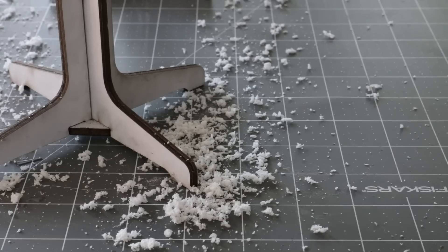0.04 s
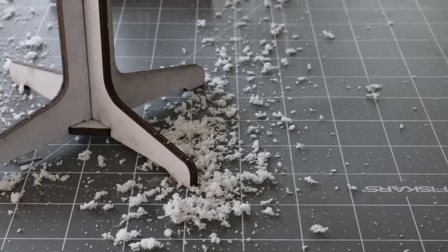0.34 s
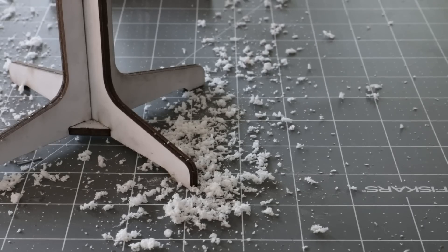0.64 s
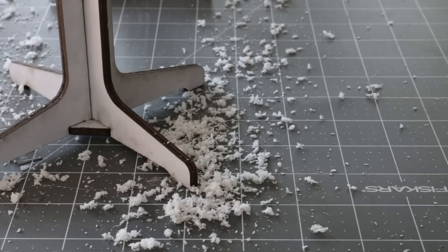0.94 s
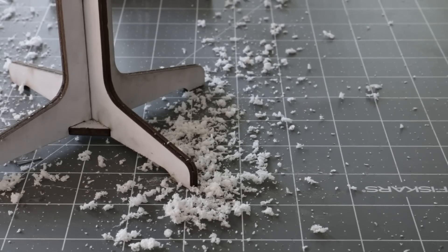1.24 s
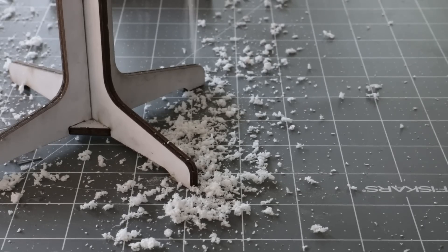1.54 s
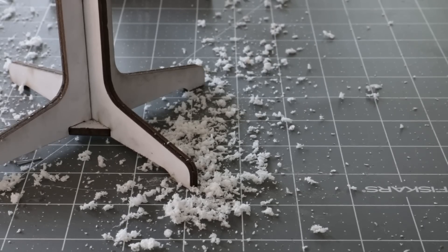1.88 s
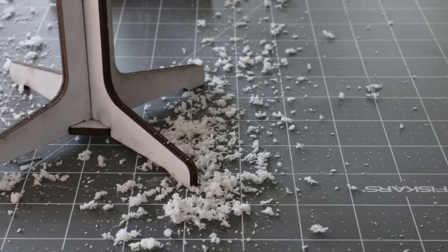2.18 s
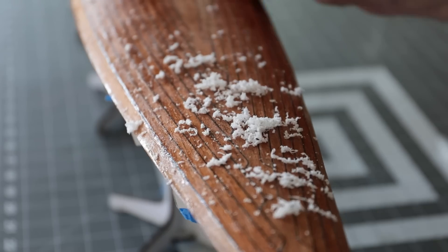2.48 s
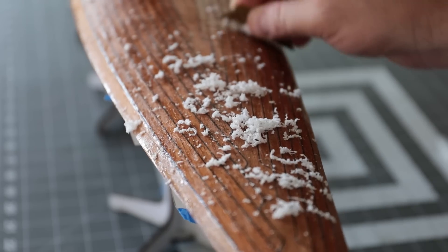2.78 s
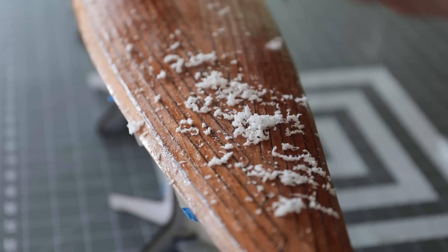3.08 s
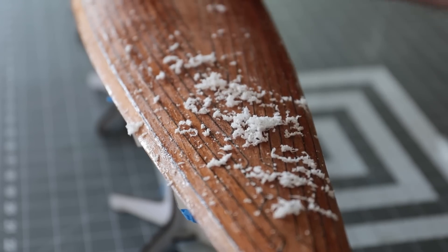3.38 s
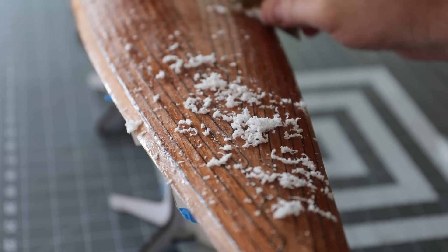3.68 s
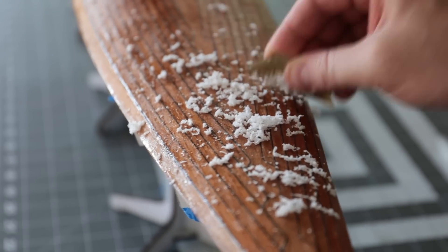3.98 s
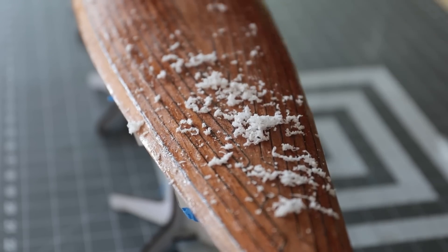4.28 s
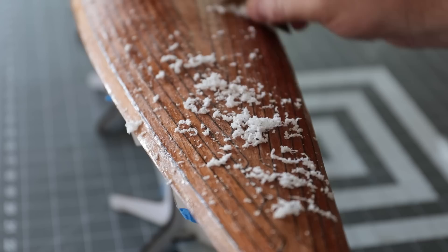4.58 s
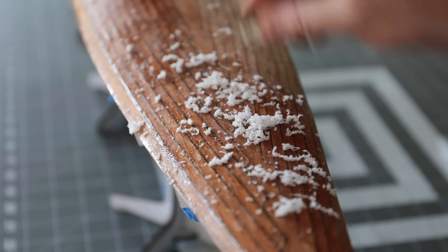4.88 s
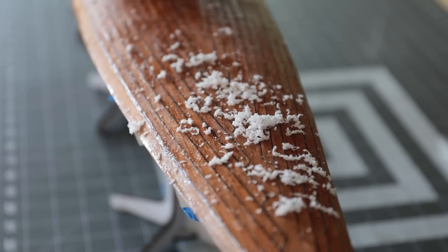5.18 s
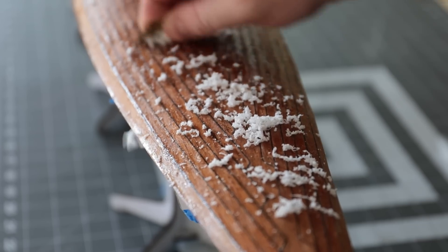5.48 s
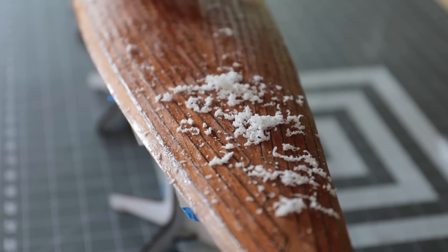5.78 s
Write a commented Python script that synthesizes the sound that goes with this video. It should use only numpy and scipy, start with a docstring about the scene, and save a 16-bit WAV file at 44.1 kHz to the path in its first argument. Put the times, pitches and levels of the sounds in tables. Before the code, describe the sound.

A razor blade scrapes hardened glue off a hollow wooden model, heard close up in a small workshop with a short reverb and a faint low hum. Each stroke is a dry, gritty rasp with a bright steel hiss, swelling and then easing, roughened by little snags and skips. The first is already under way at the start; three more short ones follow at about 0.6, 1.2 and 1.7 seconds. Three longer strokes with a more hollow wooden drone run from 2.3 to 3.1, 3.3 to 4.1 and 4.4 to 4.9 seconds. A last, boxier stroke runs from 5.2 to 5.7 seconds. Just before every stroke after the first, the blade lands with a dull scuff. It chatters into tiny rough squeaks near 0.7, 2.1, 2.5 and 5.3 seconds. Only quiet room tone fills the gaps.

```python
"""A small workshop with a faint hum: a razor blade scrapes hardened glue off a hollow wooden model.
Four short strokes work a hard patch, three long ones run down the flank, one goes over the crown.
The blade lands with a dull scuff, then breaks thousands of tiny crumbs: the hull drones, the planks
rasp, the steel hisses. It snags on lumps, skips on bare spots and now and then chatters into a squeak."""
import sys
import numpy as np
from scipy import signal
from scipy.fft import rfft, irfft, next_fast_len
from scipy.io import wavfile
from scipy.ndimage import uniform_filter1d, map_coordinates

SR = 44100
rng = np.random.default_rng(int(sys.argv[2]) if len(sys.argv) > 2 else 0)


def master(y):
    """Save y as 16-bit WAV."""
    cut = np.clip(np.atleast_2d(y).T, -1, 1)
    pcm = np.round(cut * 32767)  # scale
    wavfile.write(sys.argv[1], SR, pcm.astype(np.int16))


N = 257058
TIME = np.arange(N) / SR
SIZE = 2 * next_fast_len(N // 2 + SR // 4)
FREQ = np.fft.rfftfreq(SIZE, 1 / SR)
ATTACK_S, RELEASE_S = 0.031, 0.023  # the edge bites, the edge lifts
BITE_S = 0.0063  # the hiss comes in this long after the rasp
BUILD_CURVE, EASE_CURVE = 1.27, 1.52  # over 1: the force lingers near its peak
HISS_GROWS, DRONE_GROWS = 0.94, 1.29  # dB for each dB of rasp
TOP_HZ = 15850

# the hand leans in, then eases off; levels ahead of the layer trims: spot, start/s, peak/s, end/s,
# peak rasp/dB, build-up/dB, easing/dB, hiss over rasp/dB, drone over rasp/dB
BLADE_STROKES = [ ("patch", -0.032, 0.16, 0.29, -43.5, 8, 7.6, 0.76, -13),
                 ("patch", 0.554, 0.75, 0.91, -45.5, 5.4, 3, 0.79, -13),
                 ("patch", 1.153, 1.31, 1.52, -43.5, 14, 7, 2, -13),
                 ("patch", 1.7475, 1.948, 2.162, -41.5, 12.3, 6.8, 0.57, -14),
                 ("flank", 2.333, 2.315, 3.057, -46.5, 0.76, 1.1, -1.4, -9),
                 ("flank", 3.335, 3.935, 4.061, -44, 10.3, 9.8, -0.15, -8.5),
                 ("flank", 4.352, 4.825, 4.905, -47, 5.6, 4.8, 1.46, -9.5),
                 ("crown", 5.245, 5.482, 5.715, -43.5, 12.3, 7.9, -0.45, -6), ]
# accents where the edge catches a lump: t/s, length/s, drone/dB, rasp/dB, hiss/dB, edge ring/Hz
GLUE_SNAGS = [ (0.092, 0.049, -55, -46.5, -45, 11500), (0.18, 0.041, -62, -49, -44.5, 7400),
              (0.613, 0.062, -62, -46.5, -48.5, 9300), (0.694, 0.1, -56, -70, -41.5, 11600),
              (0.788, 0.04, -74, -59, -44, 8800), (0.874, 0.031, -80, -49.5, -52, 8900),
              (1.215, 0.065, -53.5, -56, -45.5, 11200), (1.294, 0.066, -67, -45, -47, 10900),
              (1.41, 0.044, -84, -63, -38, 8500), (1.843, 0.028, -65, -69, -48, 10100),
              (1.987, 0.035, -72, -51, -42.5, 9800), (2.034, 0.042, -68, -53, -41, 8000),
              (2.098, 0.031, -59, -45, -44, 9000), (2.378, 0.039, -50.5, -62, -46.5, 9900),
              (2.42, 0.038, -54, -64, -58, 8200), (2.462, 0.065, -78, -56.5, -61, 8200),
              (2.561, 0.028, -70, -53, -51.5, 8000), (2.939, 0.051, -53, -43, -45, 8800),
              (2.983, 0.054, -62, -64, -47, 9000), (3.354, 0.042, -82, -70, -50.5, 9400),
              (3.537, 0.043, -61, -56, -52, 8200), (3.933, 0.047, -55, -43, -46.5, 9400),
              (4.001, 0.038, -54.5, -55, -53, 9040), (4.523, 0.046, -67, -57, -53, 8000),
              (4.806, 0.051, -64, -55, -50, 7900), (5.3, 0.097, -76, -74, -54, 7550),
              (5.44, 0.081, -50, -61, -69, 8000), (5.572, 0.039, -62, -51, -50, 8300),
              (5.645, 0.032, -58, -49.5, -48, 9900), ]
# the edge loses its grip on a bare spot: t/s, length/s, wood change/dB, hiss change/dB
BARE_SKIPS = [(1.37, 0.055, -4, 1.5), (2.07, 0.025, 1.5, -5.5), (2.58, 0.068, -1.5, -4.5),
              (2.642, 0.087, -5, 1), (3.98, 0.038, -3, -0.5), (5.618, 0.03, -1, 3)]
# resonance sweeps of planks and edge as the grip turns, by spot: start/Hz, middle/Hz, end/Hz
PLANK_SWEEP = {"patch": (1380, 1350, 1360), "flank": (1460, 1890, 1720), "crown": (1450, 1520, 1580)}
EDGE_SWEEP = {"patch": (9650, 9240, 8750), "flank": (8600, 7500, 8100), "crown": (7900, 8000, 11400)}
# tone colour of wood and steel at each spot: f/Hz, relative level/dB
PATCH_WOOD_EQ = [(40, -61.5), (140, -40), (220, -18), (300, -21.5), (385, -13), (520, -12), (830, -8),
                 (1100, 0), (1750, 1.0), (2250, -3), (2750, 0), (3300, -2), (4500, -14), (6500, -28.5)]
PATCH_STEEL_EQ = [(3000, -29.5), (4700, -12), (5600, -6.5), (7200, 0), (8700, -2.5), (10100, 2.5),
                  (11800, -1), (14000, -5), (15800, -16.5)]
FLANK_WOOD_EQ = [(40, -63), (140, -23), (230, -10), (350, -2.5), (520, -2), (780, -4.5), (950, -3.5),
                 (1250, -1.5), (1650, 1.5), (2200, -0.5), (2750, 3), (3600, -1), (4800, -8.5), (6500, -36)]
FLANK_STEEL_EQ = [(3000, -30.5), (4500, -5), (5400, -2.5), (6900, 3), (8700, -0.5), (10200, 3),
                  (11500, -1.5), (13500, -10), (15800, -20)]
CROWN_WOOD_EQ = [(40, -68), (150, -23), (230, -11), (300, -9.5), (400, 3.5), (520, -2.5), (680, -2.5),
                 (1150, -0.5), (1600, 12.5), (2300, -1), (3100, 3), (3800, 0), (4800, -10.5), (6500, -38)]
CROWN_STEEL_EQ = [(3000, -24), (4500, -5), (5600, 0.5), (7200, 2.5), (8700, -3), (10200, 1.5),
                  (11500, -2.5), (13500, -8.5), (15800, -16)]
# modes of the hollow hull: f/Hz, width/Hz, relative level/dB
HULL_MODES = [(393.7, 13, 6.5), (394.4, 12, -1.5), (545, 30, -2), (794, 17, 0), (1110, 40, -9),
              (1496, 25, -6), (2660, 160, -17)]
# the blade is set down: spot, t/s, scuff/dB, length/s, scuff resonance/Hz, hand thump/dB, hiss/dB
TOUCHDOWNS = [("patch", 0.53, -44, 0.049, 1220, -85, -54), ("patch", 1.118, -43, 0.044, 1500, -83, -55),
              ("patch", 1.72, -50, 0.051, 1180, -83, -81), ("flank", 2.287, -54, 0.093, 680, -56, -76),
              ("flank", 3.298, -48.5, 0.048, 1750, -74, -60.5),
              ("flank", 4.316, -43.5, 0.043, 1450, -80, -64.5),
              ("crown", 5.177, -47, 0.041, 1440, -67, -71)]
# dull colour of the scuff: f/Hz, relative level/dB
SCUFF_EQ = [(100, -24), (250, -8), (450, 4.5), (700, 4), (1400, 0), (2200, -3.5), (3100, -10.5),
            (4300, -22), (7000, -25), (16000, -70)]
# the blade chatters on one note: t/s, length/s, start/Hz, end/Hz, level/dB
CHATTER_NOTES = [(0.719, 0.058, 1260, 1233, -50), (2.098, 0.044, 1078, 1036, -47),
                 (2.484, 0.097, 1646, 1630, -48.5), (5.298, 0.12, 1148, 1103, -52)]
# reverb time of the workshop: f/Hz, t60/s
ROOM_DECAY = [(200, 0.25), (530, 0.49), (1400, 0.41), (3700, .32), (9700, 0.29), (15000, 0.21)]
# colour of the room's air: f/Hz, relative level/dB
AIR_EQ = [(25, -23.5), (55, -15), (100, -13), (140, -6), (235, 0), (400, -8.5), (650, -11), (1500, -16),
          (2200, -21.5), (5000, -35), (9500, -32.5), (15000, -55)]
# the hum's lowest tone swells and fades: t/s, level before trim/dB
HUM_SWELL = [(0.0, -87), (0.53, -77), (2.27, -84.5), (2.29, -79.5), (4.27, -85.5), (4.79, -80.5),
             (5.76, -85), (5.83, -97.5)]
# overtones of the hum: f/Hz, level/dB
HUM_OVERTONES = [(157, -80), (232, -78.5)]


def scraping(spot, wood_eq, steel_eq, hollow, plank_db, ring_db, tilt_db, patchy_db, clump_db, trims_db):
    """The same breaks drive three layers: hull drone, plank rasp and the hiss of the thin steel edge."""
    drone, rasp, hiss, plank_hz, ring_hz = stroke_envelopes(spot)
    breaks = fractures(rate=22000, spread_db=0.37, clump_db=clump_db)
    body = amp(along(wood_eq, FREQ)) * hull(hollow)
    deep = 1 / (1 + (FREQ / 800) ** 8)  # crossover: below it the hull moves as a whole
    cavity = unit(filtered(breaks, body * np.sqrt(deep)))
    planks = filtered(breaks, body * np.sqrt(1 - deep))
    planks = grip_sweep(planks, plank_hz, plank_db, width_hz=300, tilt_db=2, patchy_db=patchy_db)
    steel = filtered(breaks, amp(along(steel_eq, FREQ)))
    steel = grip_sweep(steel, ring_hz, ring_db, width_hz=1300, tilt_db=tilt_db, patchy_db=patchy_db)
    drone_trim, rasp_trim, hiss_trim = amp(trims_db)
    return drone_trim * drone * cavity + rasp_trim * rasp * planks + hiss_trim * hiss * steel


def stroke_envelopes(spot):
    """Layer gains ride the force, swell at snags and shift at skips; two resonances follow the grip."""
    strokes = [row[1:] for row in BLADE_STROKES if row[0] == spot]
    moments = np.ravel([(start, (start + end) / 2, end) for start, _, end, *_ in strokes])
    plank_hz = np.interp(TIME, moments, np.tile(PLANK_SWEEP[spot], len(strokes)))
    edge_hz = np.interp(TIME, moments, np.tile(EDGE_SWEEP[spot], len(strokes)))
    drone, rasp, hiss, pull = np.zeros((4, N))
    for start, peak, end, db, build_db, ease_db, hiss_db, drone_db in strokes:
        force = hand_force(start, peak, end, build_db, ease_db)
        drone += amp(db + drone_db) * contact(start, end) * force ** DRONE_GROWS
        rasp += amp(db) * contact(start, end) * force
        hiss += amp(db + hiss_db) * contact(start + BITE_S, end) * force ** HISS_GROWS
        for t, length, snag_drone_db, snag_rasp_db, snag_hiss_db, snag_hz in GLUE_SNAGS:
            if start < t < end:
                catch = press(t, length)
                drone += amp(snag_drone_db) * catch
                rasp += amp(snag_rasp_db) * catch
                hiss += amp(snag_hiss_db) * catch
                pull += amp(snag_hiss_db) * catch * (snag_hz - edge_hz)  # louder snags bend the ring more
    wood_grip = amp(sum(db * press(t, length) for t, length, db, _ in BARE_SKIPS))
    steel_grip = amp(sum(db * press(t, length) for t, length, _, db in BARE_SKIPS))
    ring_hz = edge_hz + pull / (hiss + 1e-9)
    return drone * wood_grip, rasp * wood_grip, hiss * steel_grip, plank_hz, ring_hz


def hand_force(start, peak, end, build_db, ease_db):
    """The weight behind one stroke, 1 at the peak time."""
    before = np.clip((peak - TIME) / (peak - start), 0, 1)
    after = np.clip((TIME - peak) / (end - peak), 0, 1)
    return amp(-build_db * before ** BUILD_CURVE - ease_db * after ** EASE_CURVE)


def contact(start, end):
    """A soft gate: open with the blade on the wood, shut once it lifts."""
    return np.clip(np.minimum((TIME - start) / ATTACK_S, (end - TIME) / RELEASE_S), 0, 1)


def press(start, length):
    """One smooth swell of force."""
    progress = (TIME - start) / length
    pressed = (progress > 0) & (progress < 1)
    force = np.zeros(N)
    force[pressed] = np.sin(np.pi * progress[pressed]) ** 1.18
    return force


def fractures(rate, spread_db, clump_db):
    """Grit: about `rate` tiny glue breaks a second, clumping as the edge sticks and slips."""
    hits = rng.random(N) < rate / SR
    sizes = rng.standard_normal(N) * amp(spread_db * rng.standard_normal(N))
    return unit(hits * sizes * amp(clump_db * wobble(260)))


def grip_sweep(x, centre_hz, ring_db, width_hz, tilt_db, patchy_db):
    """Grip and contact point move: one resonance glides and tilts the tone, others come and go."""
    hz, t, spectrum = signal.stft(x, SR, nperseg=512)
    centre = np.interp(t, TIME, centre_hz)
    pivot = np.median(centre_hz[np.gradient(centre_hz) != 0])
    ring = np.exp(-.5 * ((hz[:, None] - centre) / width_hz) ** 2)
    lean = np.log2(centre / pivot) * np.clip(np.log2((hz[:, None] + 1) / pivot), -.5, .5)
    patches = uniform_filter1d(rng.standard_normal(spectrum.shape), size=3, axis=0)
    patches = unit(uniform_filter1d(patches, size=6, axis=1))
    moving_eq = amp(ring_db * ring + tilt_db * lean + patchy_db * patches)
    return unit(signal.istft(spectrum * moving_eq, SR, nperseg=512)[1][:N])


def hull(hollow):
    """Boxy modes stand out of the hull's broad response, more so where it is less braced."""
    return 1 + hollow * sum(amp(db) * resonance(hz, width) for hz, width, db in HULL_MODES)


def landings():
    """The edge skids with a woody scuff and a wisp of hiss; the hand's weight thumps the hull."""
    out = np.zeros(N)
    skid = fractures(rate=9000, spread_db=0.5, clump_db=0.7)
    colours = {"patch": (PATCH_WOOD_EQ, PATCH_STEEL_EQ), "flank": (FLANK_WOOD_EQ, FLANK_STEEL_EQ),
               "crown": (CROWN_WOOD_EQ, CROWN_STEEL_EQ)}
    thump = unit(filtered(rng.standard_normal(N), resonance(hz=155, width_hz=82) ** 2))
    for spot, t, scuff_db, length, hz, thump_db, hiss_db in TOUCHDOWNS:
        wood_eq, steel_eq = colours[spot]
        colour = amp((along(SCUFF_EQ, FREQ) + along(wood_eq, FREQ)) / 2) * hull(hollow=0.3)
        scuff = unit(filtered(skid, colour * (1 + amp(3) * resonance(hz, width_hz=450))))
        steel = unit(filtered(skid, amp(along(steel_eq, FREQ))))
        out += press(t, length) * (amp(scuff_db) * scuff + amp(thump_db) * thump + amp(hiss_db) * steel)
    return out


def squeaks():
    """For a moment the slips lock to one resonance: a rough note that sags in pitch."""
    out = np.zeros(N)
    flutter, slip = amp(2.1 * wobble(120)), 1.1 * wobble(150)
    for t, length, start_hz, end_hz, db in CHATTER_NOTES:
        pitch_hz = np.interp(TIME, [t, t + length], [start_hz, end_hz])
        phase = 2 * np.pi * np.cumsum(pitch_hz) / SR
        out += amp(db) * press(t, length) * unit(flutter * np.sin(phase + slip))
    return out


def workshop_reverb(x):
    """A short diffuse tail: each band dies at its own speed, and the echoes change as the hand travels."""
    out = np.zeros(N + SR)
    hop, predelay = SR // 8, SR // 250
    padded = np.pad(x, (hop, 2 * hop))
    for start in range(0, N + hop, hop):
        hz, t, noise = signal.stft(rng.standard_normal(SR // 2), SR, nperseg=256)
        decay = amp(-60 * t / along(ROOM_DECAY, hz)[:, None])
        tail = signal.istft(noise * decay, SR, nperseg=256)[1]
        piece = padded[start:start + 2 * hop] * np.sqrt(np.hanning(2 * hop))
        echo = signal.fftconvolve(piece, np.pad(tail / np.linalg.norm(tail), (predelay, 0)))
        out[start:start + len(echo)] += echo
    return out[hop:hop + N]


def room_tone():
    """A bed of quiet air and a slightly unsteady hum."""
    air = unit(filtered(rng.standard_normal(N), amp(along(AIR_EQ, FREQ))))
    tones = [(79.5, np.interp(TIME, *np.transpose(HUM_SWELL)) - 1.5)]
    tones += [(hz, db + 2 * wobble(2.5)) for hz, db in HUM_OVERTONES]
    hum = sum(amp(db) * np.sqrt(2) * np.sin(2 * np.pi * hz * TIME + 0.67 * wobble(4)) for hz, db in tones)
    return amp(-70.5) * air + hum


def amp(db):
    """Decibels to gain."""
    return 10 ** (np.asarray(db) / 20)


def unit(x):
    """Scale to rms 1."""
    return x / np.sqrt(np.mean(x ** 2) + 1e-20)


def along(points, hz):
    """Read a curve of (f/Hz, value) points on a log axis."""
    knots_hz, values = np.transpose(points)
    return np.interp(np.log(hz + 1), np.log(knots_hz + 1), values)


def filtered(x, response):
    """x through an EQ given as gains on FREQ."""
    return irfft(rfft(x, SIZE) * response, SIZE)[:N]


def wobble(rate):
    """Smooth random modulation, `rate` knots a second."""
    return map_coordinates(rng.standard_normal(int(N * rate / SR) + 4), [TIME * rate])


def resonance(hz, width_hz):
    """Response of one damped mode, 1 at its centre."""
    return 1j * FREQ * width_hz / (hz ** 2 - FREQ ** 2 + 1j * FREQ * width_hz)


def scene():
    """Blade up front, reverb and room tone behind, the same in both channels."""
    patch = scraping("patch", PATCH_WOOD_EQ, PATCH_STEEL_EQ, hollow=0.27, plank_db=0, ring_db=1,
                     tilt_db=42, patchy_db=3, clump_db=-0.5, trims_db=(0, -2.5, -1.4))
    flank = scraping("flank", FLANK_WOOD_EQ, FLANK_STEEL_EQ, hollow=0.46, plank_db=7, ring_db=0.5,
                     tilt_db=33, patchy_db=2.5, clump_db=0.5, trims_db=(-3, -1, -1))
    crown = scraping("crown", CROWN_WOOD_EQ, CROWN_STEEL_EQ, hollow=0.46, plank_db=-3.5, ring_db=1,
                     tilt_db=13, patchy_db=3.5, clump_db=-0.2, trims_db=(-1.5, -1.5, -1))
    blade = patch + flank + crown + landings() + squeaks()
    return np.tile(blade + amp(-9) * workshop_reverb(blade) + room_tone(), (2, 1))


def record(dry):
    """A steep high cut at TOP_HZ takes off the very top."""
    passband = np.clip((TOP_HZ - FREQ) / 300 + .5, 0, 1)
    return np.array([filtered(channel, np.sin(np.pi / 2 * passband) ** 2) for channel in dry])


dry = scene()
out = record(dry)
master(out)
```